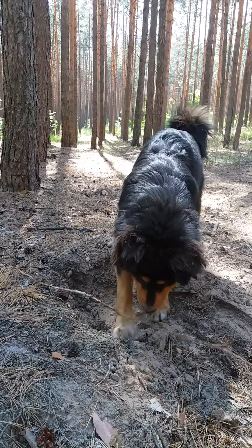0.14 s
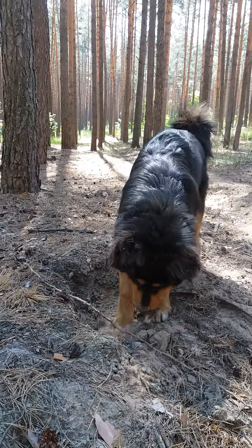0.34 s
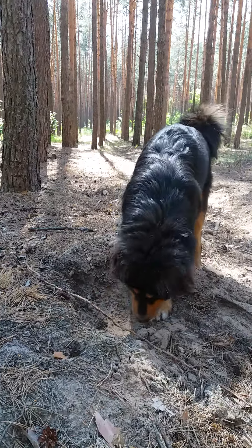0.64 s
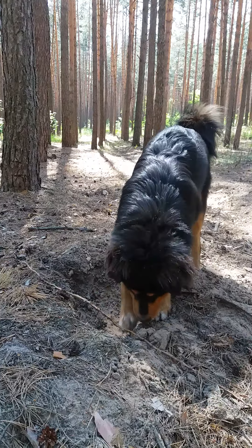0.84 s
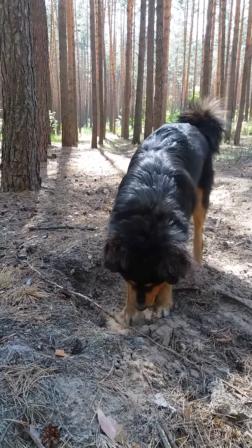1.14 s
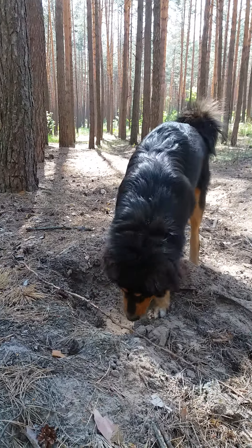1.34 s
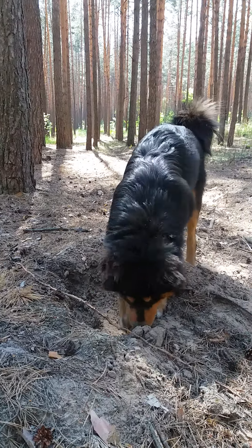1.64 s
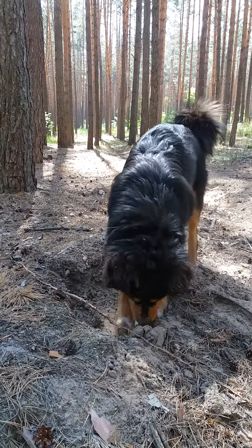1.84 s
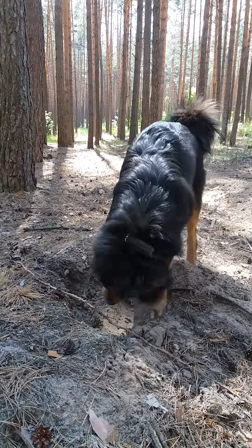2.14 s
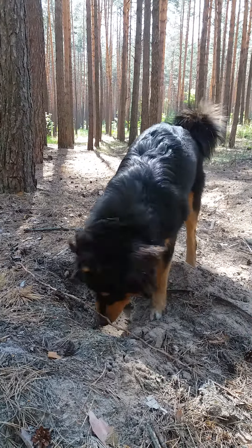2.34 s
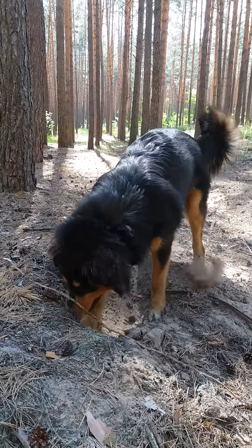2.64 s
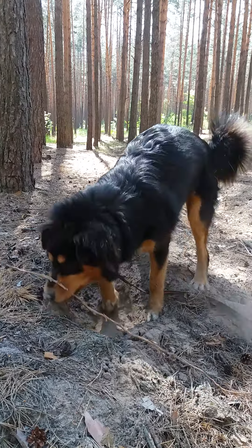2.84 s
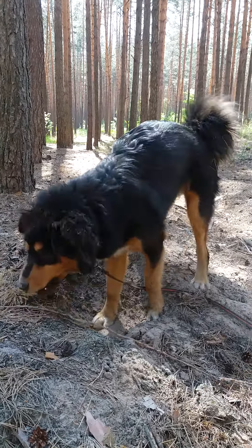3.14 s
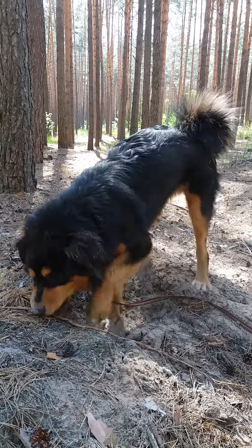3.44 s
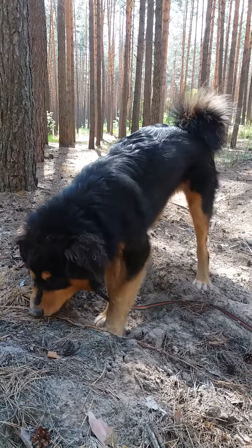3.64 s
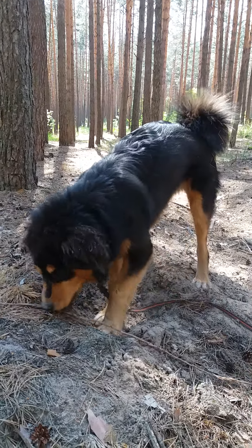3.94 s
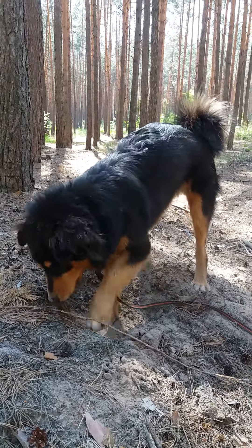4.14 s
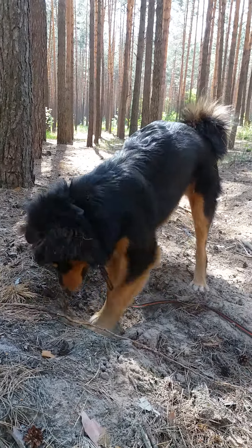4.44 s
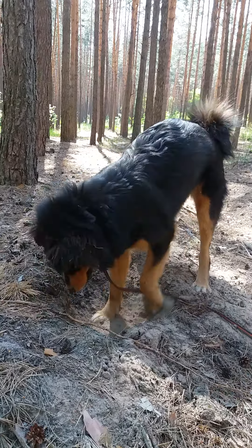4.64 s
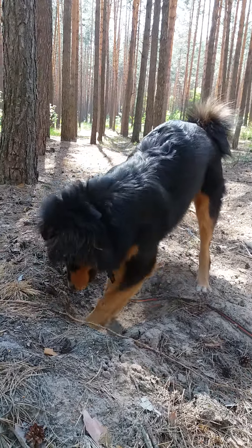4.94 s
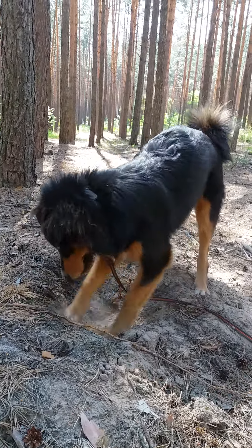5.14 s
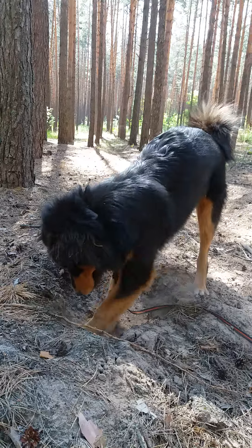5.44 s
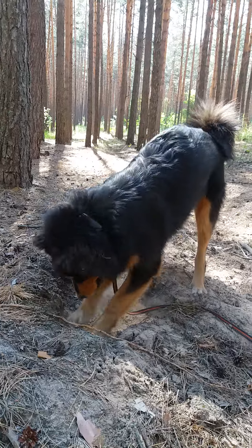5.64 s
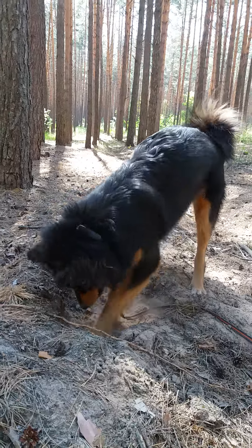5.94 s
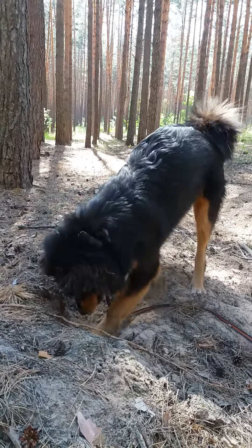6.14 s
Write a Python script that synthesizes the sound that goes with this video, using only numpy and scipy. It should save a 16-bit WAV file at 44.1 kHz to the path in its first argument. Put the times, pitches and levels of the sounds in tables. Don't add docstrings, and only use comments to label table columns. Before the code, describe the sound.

Outdoors in an echoing pine forest, a dog's quick, hollow sniffs and faint nose whistles sit close and dry. A bright bird calls sharply, another trills and sings falling phrases, with blurred birds beyond. Twigs snap, soil scrapes softly, and a snort puffs out midway. A quieter stretch gives way to clustered soft paw thuds and crunching sand at the end, over treetop hush, microphone hiss and a far motor.

```python
import sys
import numpy as np
from scipy import signal
from scipy.fft import rfft, irfft, next_fast_len
from scipy.io import wavfile

SR = 44100
rng = np.random.default_rng(int(sys.argv[2]) if len(sys.argv) > 2 else 0)


def file_out(sig):
    cols = np.atleast_2d(sig).T
    lim = np.clip(cols, -1, 1)
    pcm = np.round(lim * 32767).astype(np.int16)
    wavfile.write(sys.argv[1], SR, pcm)


def boost_factor(decibels):
    exponent = np.asarray(decibels, float) / 20
    return 10 ** exponent


N = 276886
T = np.arange(N) / SR


def rms_one(x):
    return x / np.sqrt(np.mean(x ** 2) + 1e-20)


def in_time(rows):
    s, *columns = np.transpose(rows)
    return [np.interp(T, s, column) for column in columns]


def drift(rate_hz):
    r = np.exp(-2 * np.pi * rate_hz / SR)
    white = rng.standard_normal(N + SR)
    return rms_one(signal.lfilter([1], [1, -2 * r, r * r], white)[SR:])


def resonate(x, hz, width_hz):
    r = np.exp(-np.pi * width_hz / SR)
    poles = [1, -2 * r * np.cos(2 * np.pi * hz / SR), r * r]
    return signal.lfilter([(1 - r * r) / 2, 0, (r * r - 1) / 2], poles, x)


def add(track, s, sound):
    i = round(s * SR)
    track[i:i + len(sound)] += sound[:N - i]


def note(ms, first_hz, middle_hz, last_hz, db):
    u = np.linspace(-1, 1, int(ms * SR / 1000))
    bend = (first_hz + last_hz) / 2 - middle_hz
    hz = middle_hz + u * (last_hz - first_hz) / 2 + u * u * bend
    flutter = boost_factor(2.4 * np.interp(u, np.linspace(-1, 1, 8), rng.standard_normal(8)))
    return boost_factor(db) * flutter * (1 - u * u) ** 0.21 * np.sin(2 * np.pi * np.cumsum(hz) / SR)


def wood(x):
    t60_s, rise_s = 0.85, 0.0015
    t = T[:SR]
    echo = rng.standard_normal(SR) * boost_factor(-60 * t / t60_s) * np.clip(t / rise_s, 0, 1)
    echo *= boost_factor(2.1 * np.interp(t * 90, np.arange(100), rng.standard_normal(100)))
    return signal.fftconvolve(x, echo / np.sqrt(np.sum(echo ** 2)))[:N]


def through_trunks(x, scatter_db):
    dying_s = .014
    cloud = rng.standard_normal(2000) * np.exp(-T[:2000] / dying_s)
    cloud /= np.sqrt(np.sum(cloud ** 2))
    return x + boost_factor(scatter_db) * signal.fftconvolve(x, cloud)[:len(x)]


def off_trunks(x):
    # delay/s, level/dB
    echoes = [(.011, -14), (.022, -8), (.036, -11), (.047, -14)]
    out = x.copy()
    for s, db in echoes:
        add(out, s, boost_factor(db) * x)
    return out


def grains(per_s, spread_db, low_hz, high_hz, cycles):
    sizes = boost_factor(spread_db * np.minimum(rng.exponential(1, N), 5)) * rng.choice([-1, 1], N)
    born = rng.random(N) < per_s / SR
    dealt = rng.integers(0, 10, N)
    rings = np.zeros(N)
    for k, hz in enumerate(np.geomspace(low_hz, high_hz, 10)):
        rings += resonate(sizes * born * (dealt == k) + 1e-18, hz, hz / cycles)
    band = signal.butter(2, [low_hz * 0.34, high_hz * 0.82], "band", fs=SR, output="sos")
    return rms_one(signal.sosfilt(band, rings))


def hush():
    # f/Hz, density/dB per Hz
    colour = [(18, -49), (30, -12), (98, -1.5), (156, -11.5), (660, -23.5), (814, -24.5), (978, -20.5),
              (2150, -31.5), (2860, -37), (3530, -38.5), (4470, -40.5), (5230, -44.5), (6120, -46.5),
              (7160, -42), (15700, -40)]
    level_db = -54.5
    size = next_fast_len(N)
    hz = np.arange(size // 2 + 1) * SR / size + 1
    at, db = np.transpose(colour)
    shape = boost_factor(np.interp(np.log(hz), np.log(at), db))
    noise = irfft(rfft(rng.standard_normal(size)) * shape, size)[:N]
    return boost_factor(level_db + .5 * drift(3.7)) * rms_one(noise)


def engine():
    # t/s, turn rate/Hz
    speed = [
        (0, 17.9),
        (3, 17.55),
        (6.28, 17.15),
    ]
    # t/s, level/dB
    loudness = [(0, -76), (.3, -59), (1, -57), (1.5, -53), (2, -52.5), (3, -57), (3.6, -53.5), (4.2, -54),
                (5, -53), (6.28, -54.5)]
    # multiple of the turn rate, level/dB, blur/Hz
    orders = [(3, -13, 5), (4, -3, 5), (5, -2.5, 3), (6, 0, 2.5), (9, -11, 3), (10, -12, 3), (12, -15, 4)]
    (turn_hz,), (level_db,) = in_time(speed), in_time(loudness)
    turns = 2 * np.pi * np.cumsum(turn_hz) / SR
    drone = np.zeros(N)
    for k, db, blur_hz in orders:
        steady = (1.27 + drift(blur_hz)) * np.cos(k * turns)
        drone += boost_factor(db) * (steady + drift(blur_hz) * np.sin(k * turns))
    return boost_factor(level_db + 1.5) * rms_one(drone)


def scrape():
    # t/s, level/dB
    strokes = [(0.0, -77), (0.35, -60.5), (0.94, -63), (1.17, -56), (1.55, -61.5), (1.87, -54.5),
               (2.13, -61), (4.97, -60), (5.18, -58), (5.65, -55), (5.82, -56), (6.28, -54.5)]
    return boost_factor(in_time(strokes)[0] - 8.5) * grains(2000, 2.7, 215, 1960, cycles=1.85)


def chorus():
    # start/s, end/s, level/dB, lowest f/Hz, highest f/Hz
    singers = [(0, 0.125, -70.5, 2594, 3450), (0, 0.19, -79.5, 4600, 5190), (0, 0.902, -69, 2320, 3490),
               (1.05, 2.301, -63, 2080, 4385), (2.097, 3.2, -66, 2144, 3680),
               (4.801, 5.846, -69, 1904, 4770), (5.6, 6.275, -71, 2000, 3716)]
    fade_s, fade_db = 0.27, 9.5
    out = np.zeros(N)
    for start, end, db, low_hz, high_hz in singers:
        for when, a, b, spread in rng.random((170, 4)):
            s = start + when * (end - start)
            fade = np.clip(1 - min(s - start, end - s) / fade_s, 0, 1)
            first, last = low_hz + (high_hz - low_hz) * np.array([a, b])
            add(out, s, note(10.53, first, (first + last) / 2, last, db - fade_db * fade + 2.5 * spread))
    return out


def far_birds():
    # t/s, level/dB
    trill_level = [(3.55, -83), (3.61, -72), (3.79, -65), (3.86, -65), (3.92, -67.5), (4.22, -68.5),
                   (4.25, -91), (4.5, -83)]
    cycle = 2 * np.pi * 31 * T + 1.5 * drift(8)
    beat = np.sin(cycle)
    slur = np.cos(cycle)
    sung = boost_factor(in_time(trill_level)[0]) * (T > trill_level[0][0]) * (T < trill_level[-1][0])
    high_hz = 3460 + 110 * slur + 35 * drift(20)
    low_hz = 3020 - 190 * slur
    high = np.clip(beat, 0, 1) * np.sin(2 * np.pi * np.cumsum(high_hz) / SR)
    low = np.clip(-beat, 0, 1) * np.sin(2 * np.pi * np.cumsum(low_hz) / SR)
    low *= boost_factor(np.interp(T, [3.75, 4.0], [-12, -4]))
    trill = through_trunks(boost_factor(4.0) * sung * (high + low), scatter_db=5)
    return wood(chorus()) + boost_factor(-9.0) * trill + boost_factor(-3.5) * wood(trill)


def song():
    # downstroke t/s, level/dB
    trill = [(0.586, -58), (0.647, -54.5), (0.709, -54), (0.774, -55.5), (0.834, -55), (0.894, -55.5),
             (0.955, -55.5), (1.020, -53.5), (2.223, -58.5), (2.282, -55.5)]
    # t from downstroke/s, length/ms, first f/Hz, middle f/Hz, last f/Hz, level/dB
    syllable = [
        (-.022, 13, 4200, 4300, 4430, -4),
        (-.007, 7, 4450, 4950, 5750, -4),
        (.001, 11, 5650, 4850, 4450, 0),
    ]
    # t/s, progress early to late form/0-1, fall level/dB, rise level/dB, turn level/dB
    phrases = [(1.069, 0.12, -50.5, -52, -59), (1.236, 0.13, -51.5, -52, -59),
               (1.39, 0.44, -53.5, -58, -55), (1.559, 0.72, -55.5, -61, -54), (1.718, .95, -56, -56, -57),
               (1.882, 0.98, -59, -57, -55.5), (2.051, 0.98, -60.5, -56.5, -55)]
    # t in phrase/s, length/ms, first f/Hz, middle f/Hz, last f/Hz
    early_form = [
        (0, 22.5, 4840, 4680, 4310),
        (0.041, 12, 4050, 4500, 5300),
        (.075, 19, 3180, 3120, 2640),
    ]
    late_form = [
        (.003, 23, 5110, 4540, 3800),
        (.031, 30.5, 2742, 2950, 3770),
        (0.079, 24.2, 2440, 2670, 2400),
    ]
    # t/s, fall level/dB, rise level/dB
    twitter = [(2.607, -69, -66), (2.697, -64, -60), (2.788, -62, -64), (2.882, -66, -64)]
    # t/s, length/ms, level/dB
    risers = [(.086, 80, -65), (0.287, 95, -65.5), (0.514, 105, -65.5)]
    # first, middle, last f/Hz
    riser_hz = (2600, 3180, 3250)
    # t/s, length/ms, first f/Hz, last f/Hz, level/dB
    swoops = [(.048, 20, 7200, 5570, -78), (.188, 9, 5800, 4850, -68), (.293, 33, 7800, 4320, -63),
              (0.413, 21, 7500, 5600, -60.5), (.431, 6, 5500, 4050, -57), (.44, 14, 5400, 6300, -66),
              (2.463, 35, 5650, 4720, -66), (6.204, 24, 7700, 5800, -70), (6.236, 12, 5750, 6300, -67),
              (6.245, 18, 5370, 4900, -68)]
    slurs = [(0.493, 18.4, 4785, 5490, -55.5), (.507, 8, 5360, 3850, -56), (2.345, 23, 3710, 2550, -55.5),
             (2.490, 26, 2970, 2750, -62), (2.547, 12.6, 3030, 2720, -60.5), (2.808, 63, 4330, 4330, -75),
             (3.013, 17, 3230, 2710, -62), (3.090, 51, 3550, 3350, -76), (3.15, 75, 3330, 3290, -76),
             (3.225, 59, 3410, 3280, -73), (3.355, 21, 3350, 2844, -64), (4.468, 25, 3377, 2950, -72),
             (1.443, 7.5, 4300, 4900, -54), (3.444, 43, 4170, 4180, -79), (4.870, 49, 5400, 4400, -83),
             (5.54, 17, 3090, 3300, -60.5), (5.792, 19, 3000, 3420, -63), (5.817, 22, 3210, 2470, -62),
             (5.70, 10, 3250, 3130, -60.5), (5.945, 25, 3200, 2700, -65.5), (5.911, 22, 2600, 3334, -71),
             (6.020, 55, 4560, 4280, -80), (6.046, 18, 3000, 3380, -67), (6.068, 24, 3250, 2530, -63),
             (6.21, 21, 2950, 3060, -68)]
    halfway = 0.43

    out, covered = np.zeros(N), np.zeros(N)
    for at, db in trill:
        for s, *shape in syllable:
            add(out, at + s, boost_factor(db) * note(*shape))
    out = off_trunks(out)
    for at, late, *levels in phrases:
        strokes = (1 - late) * np.array(early_form) + late * np.array(late_form)
        for (s, *shape), db in zip(strokes, levels):
            add(covered, at + s, note(*shape, db - 2.0))
    for at, fall_db, rise_db in twitter:
        add(out, at, note(14, 3150, 2980, 2750, fall_db + 1.5))
        add(out, at + .040, note(14, 2740, 2930, 3170, rise_db - 0.5))
    for s, ms, db in risers:
        add(out, s, note(ms, *riser_hz, db))
    for s, ms, first, last, db in [*swoops, *slurs]:
        add(out, s, note(ms, first, first + halfway * (last - first), last, db))
    near = through_trunks(out, scatter_db=-8) + through_trunks(covered, scatter_db=1)
    return near + boost_factor(-4) * wood(out + boost_factor(2) * covered)


def nose():
    # middle t/s, length/ms, level/dB, muzzle boom/dB, tuning ratio
    sniffs = [(.115, 63, -65, 2, 1.02), (.325, 96, -60.5, -2.5, 1.01), (0.529, 76, -60, 0.5, 1.02),
              (.60, 67, -63.5, 1, 1.02), (0.751, 42, -57.5, 4.5, 0.94), (1.051, 44, -63, -11, 1.18),
              (1.257, 85, -60, -2, 0.96), (1.332, 44, -73, -21, 1.17), (1.502, 22.1, -64.5, 8.5, 0.87),
              (2.78, 49, -65, 5.5, 0.88), (4.771, 63, -76, -20, 1.2), (4.84, 9.6, -61.5, -10, 1.07),
              (5.05, 69, -57, -6, 0.95), (5.124, 51, -65, 2.5, 0.61), (5.29, 51, -61.5, -3, 0.85),
              (6.118, 56, -60, -12, 1.24), (6.235, 71, -62.5, -19, 1.01)]
    snort = (2.980, 70, -52, -10, 1.04)
    # f/Hz, width/Hz, level/dB
    passage_modes = [
        (1718, 196, 2.5),
        (2280, 116, 0),
        (2950, 390, -4.5),
        (1100, 720, -11),
        (4600, 1440, -18.5),
    ]
    # f/Hz, width/Hz, level/dB
    nostril_modes = [
        (5000, 5100, -3.5),
        (7200, 1600, -1.5),
        (8700, 2200, -7),
        (13300, 6850, -11.5),
    ]
    sniff_hiss_db, snort_hiss_db = -21, -1.5
    puffs = [(*row, sniff_hiss_db) for row in sniffs] + [(*snort, snort_hiss_db)]
    out = np.zeros(N)
    for s, ms, db, boom_db, tuning, hiss_db in puffs:
        air = rng.standard_normal(6000)
        passage, hiss = np.zeros(6000), np.zeros(6000)
        for k, (hz, width, g) in enumerate(passage_modes):
            mode = resonate(resonate(air, hz * tuning, width), hz * tuning, width * 3)
            passage += boost_factor(g) * mode * (-1) ** k
        for hz, width, g in nostril_modes:
            hiss += boost_factor(g) * resonate(resonate(air, hz, width), hz, width * 2)
        boom = rms_one(resonate(air, 490 * tuning, 36))
        breath = rms_one(passage) + boost_factor(hiss_db) * rms_one(hiss) + boost_factor(boom_db) * boom
        puff = np.hanning(int(ms * 1.3 * SR / 1000))
        gusts = np.interp(np.arange(len(puff)) / 200, np.arange(40), rng.standard_normal(40))
        puff *= boost_factor(2.5 * gusts)
        add(out, s - len(puff) / SR / 2, boost_factor(db) * puff * breath[-len(puff):])
    return out


def stirring():
    # peak t/s, peak level/dB, dying time/s
    gusts = [(.17, -61, .015), (.30, -68, .025), (0.376, -57.5, 0.027), (1.14, -77, 0.12),
             (2.01, -72, 0.07), (2.2, -70.5, .1), (2.528, -57, 0.017), (2.66, -70, 0.11), (2.90, -68, 0.15),
             (2.98, -58, 0.039), (3.2, -69.5, 0.31), (4.37, -82, 0.2), (5.05, -68, 0.027),
             (5.38, -70.5, 0.093), (5.61, -73, 0.14), (6.009, -68, .015), (6.22, -67, 0.055)]
    rise_share, rest_db = 0.6, -82
    power = boost_factor(rest_db) ** 2
    for s, db, dying_s in gusts:
        away_s = np.where(T < s, (s - T) / rise_share, T - s)
        power = power + boost_factor(db) ** 2 * np.exp(-2 * away_s / dying_s)
    return np.sqrt(power)


def rustle():
    return stirring() * boost_factor(-3.0) * grains(4000, 2.5, 6200, 9500, cycles=6)


def ticks():
    # t/s, peak level/dB, f/Hz
    snaps = [(.143, -60, 7000), (.157, -52, 7500), (0.172, -47, 6830), (0.24, -46, 4800),
             (.239, -43.5, 2850), (.273, -54, 13170), (.296, -57, 11400), (.399, -50, 7500),
             (.530, -54, 7700), (0.61, -37, 2730), (.610, -50, 8600), (.610, -48, 13500),
             (1.119, -49, 2980), (1.986, -46.5, 7100), (1.9855, -43, 1400), (1.985, -41, 2940),
             (1.979, -47, 2300), (5.509, -50, 744), (5.779, -42, 640), (5.779, -49, 2010),
             (5.535, -56, 600.4), (6.009, -37.5, 1300), (6.011, -43, 2570), (2.526, -43.5, 3578),
             (2.526, -43, 7350), (2.540, -52, 7200), (2.615, -54, 6800), (2.892, -50, 7200),
             (2.912, -47, 7000), (3.094, -52, 5600), (3.183, -48.5, 7000), (4.480, -62, 4500),
             (4.982, -56, 5000), (5.348, -49, 4340), (5.347, -44.5, 2860), (5.450, -51.5, 4200),
             (6.010, -56, 7200), (6.163, -48, 3870), (6.267, -53, 3970)]
    edge_db = -35
    out, click = np.zeros(N), np.eye(1, 600)[0]
    edge = boost_factor(edge_db) * np.diff(click, prepend=0)
    for s, db, hz in snaps:
        width_hz = 550 + 0.09 * hz
        ring = resonate(click, hz, width_hz)
        ring = resonate(resonate(ring, hz, width_hz * 1.5), hz, width_hz * 1.5)
        add(out, s, boost_factor(db - 3) * (ring / np.abs(ring).max() + edge))
    return out


def calls():
    # t/s, peak level/dB, settled f/Hz, depth of the drop/0-1, echo level/dB
    pinks = [(0.2626, -46, 5180, 0.8, 1), (0.965, -44, 5174, 0.95, -5), (1.4618, -45.5, 5173, 0.94, 0),
             (2.6558, -51, 5070, 0.98, 1), (3.4434, -59, 5060, 0.94, 7.5), (4.534, -57, 5160, 0.74, 0.5),
             (5.175, -61, 5215, 0.63, 5), (5.946, -57, 5160, 0.42, 1.5)]
    # t after onset/s, pitch ratio, level/dB
    contour = [
        (0, 1.12, -36),
        (.004, 1.145, -13),
        (.012, 1.115, -6),
        (.022, 1.03, -1),
        (.032, .998, 1),
        (.043, 1.018, 0),
        (.052, 1.03, -43),
    ]
    blurs = [0.287, .3, 0.416, 0.95, 0.99, .5, 0.2, 0.084]
    sway_shifts = (-.03, -.01, .02, .045)
    out, (s, ratio, shape_db) = np.zeros(N), np.transpose(contour)
    t = np.arange(int(s[-1] * SR)) / SR
    for (at, db, hz, depth, echo_db), blur in zip(pinks, blurs):
        glide = 1 + depth * (np.interp(t, s, ratio) - 1)
        phase = 2 * np.pi * np.cumsum(hz * glide) / SR
        level = boost_factor(db - 2.5 + np.interp(t, s, shape_db))
        direct = np.pad(level * np.sin(phase), (0, 2000))
        add(out, at - .003, through_trunks(direct, scatter_db=-6))
        for shift in sway_shifts:
            swayed = level * np.sin(phase * (1 + blur * shift))
            add(out, at - .003, boost_factor(echo_db - 7.5) * wood(swayed))
    return out


def whistles():
    # t/s, length/ms, first f/Hz, last f/Hz, level/dB
    tones = [(1.04, 27, 1880, 1786, -64), (1.222, 54, 2310, 2190, -59.5), (1.232, 62, 1620, 1710, -60),
             (1.315, 32, 2286, 2200, -64), (2.955, 52, 1440, 1794, -60), (5.03, 59, 2300, 1760, -66),
             (5.101, 33, 1830, 1730, -65), (5.27, 29, 1856, 1740, -58.5), (6.105, 30, 2280, 2100, -61),
             (6.205, 54, 1603, 1850, -60)]
    out = np.zeros(N)
    for s, ms, first, last, db in tones:
        add(out, s, note(ms, first, (first + last) / 2, last, db))
    return out * (0.7 + 1.1 * drift(110))


def paws():
    # t/s, peak level/dB, crunch/dB, deepest ring/dB
    thuds = [(1.978, -53.5, 8.5, -1), (1.9846, -36.5, -8, -1.5), (2.946, -50.5, -5, 0),
             (5.037, -46, -10, -3), (5.200, -46, -4, 2), (5.213, -47, -36, -0.5), (5.283, -52, -7, 0),
             (5.453, -47, -4, -7), (5.486, -50, -4, -3), (5.508, -35.5, -12, 0.5), (5.535, -40, -13, 0.5),
             (5.73, -49, -9, -4), (5.779, -38, -18, -4), (5.802, -38.5, -18, -5), (5.823, -47, -13, -2),
             (5.842, -47.5, -1.5, 5), (6.009, -34, -8, 1)]
    # f/Hz, level/dB, t60/s
    soil = [
        (180, 6.5, 0.036),
        (316, 1, 0.034),
        (519, 2, 0.02),
        (877, -8.5, 0.028),
    ]
    out, t = np.zeros(N), T[:3000]
    for s, db, crunch_db, deep_db in thuds:
        luck = rng.normal(0, 1, (2, len(soil)))
        lows = np.zeros(len(t))
        for k, ((hz, g, t60), a, b) in enumerate(zip(soil, *luck)):
            begun = np.maximum(t - 0.31 / hz, 0)
            ring = np.sin(2 * np.pi * hz * (1 + 0.082 * b) * begun)
            lows += boost_factor(g + 1.4 * a - 60 * t / t60 + (deep_db if k == 0 else 0)) * ring
        grit = rng.standard_normal(len(t))
        for hz, width in [(1640, 1350), (1430, 1300), (1800, 2000)]:
            grit = resonate(grit, hz, width)
        crunch = rms_one(grit) * boost_factor(crunch_db - 3.0 - 60 * t / 0.022)
        add(out, s + 0.00022, boost_factor(db + 2.0) * (crunch - lows))
    return out


def scene():
    dog = nose() + whistles() + paws() + ticks()
    ground = boost_factor(-15.5) * wood(dog) + rustle() + scrape()
    birds = calls() + song() + far_birds()
    return (dog + ground + birds + engine() + hush())[None]


def top_cut(x):
    return signal.sosfilt(signal.butter(12, 15725, fs=SR, output="sos"), x)


def record(dry):
    cut = signal.sosfilt(signal.butter(5, 52, "high", fs=SR, output="sos"), dry)
    cut = signal.sosfilt(signal.cheby2(14, 60, 17800, fs=SR, output="sos"), cut)
    return top_cut(cut - .0006)


dry = scene()
out = record(dry)
file_out(out)
```